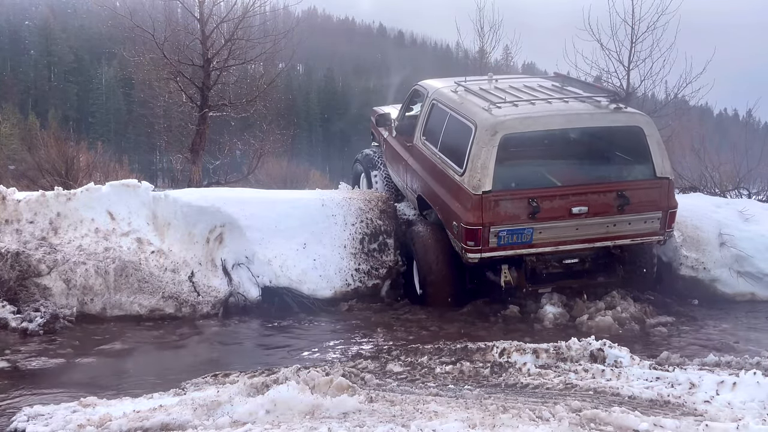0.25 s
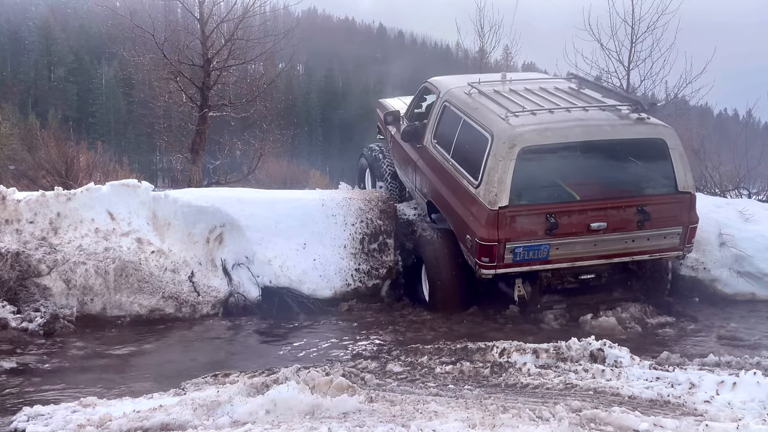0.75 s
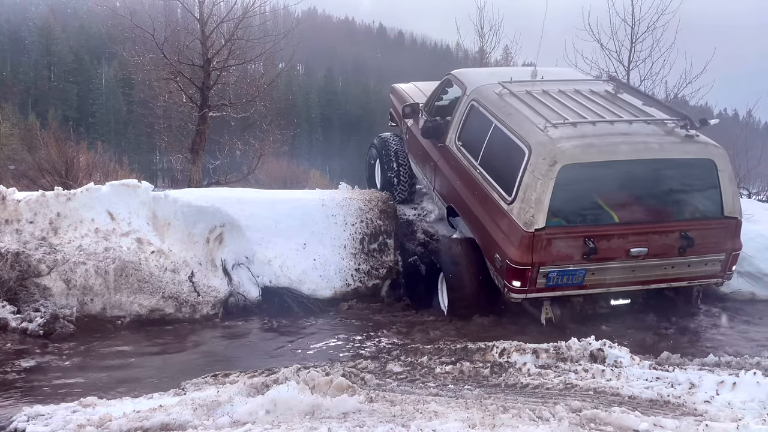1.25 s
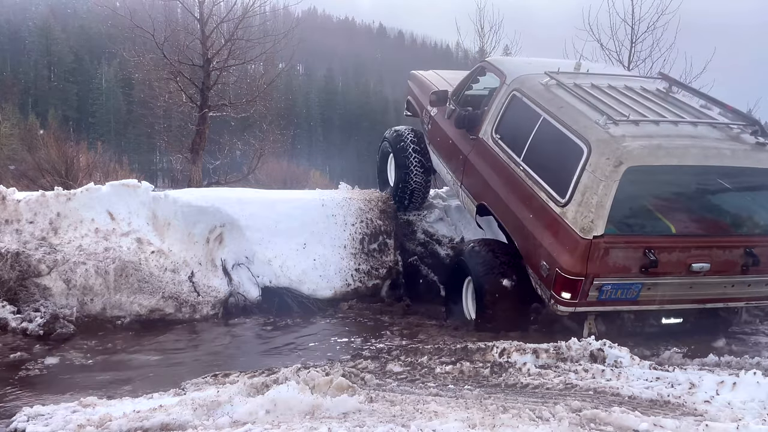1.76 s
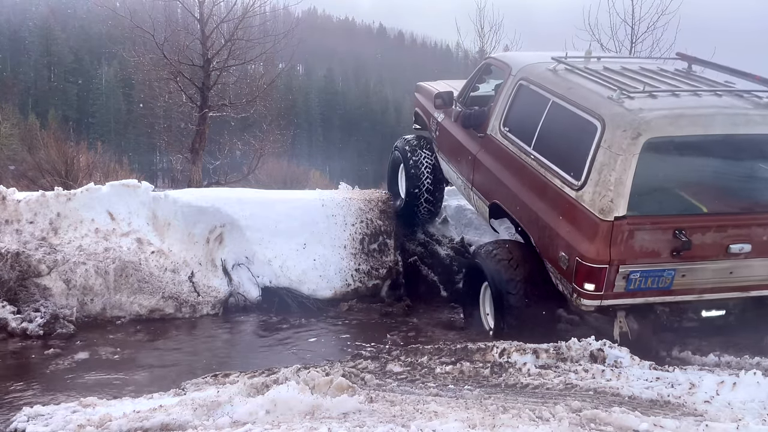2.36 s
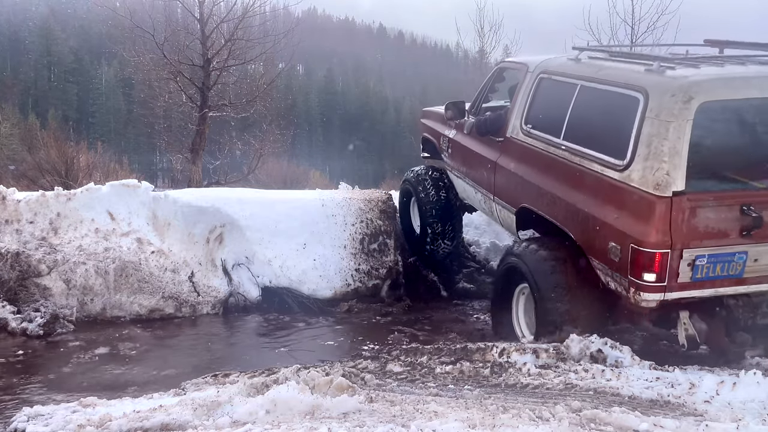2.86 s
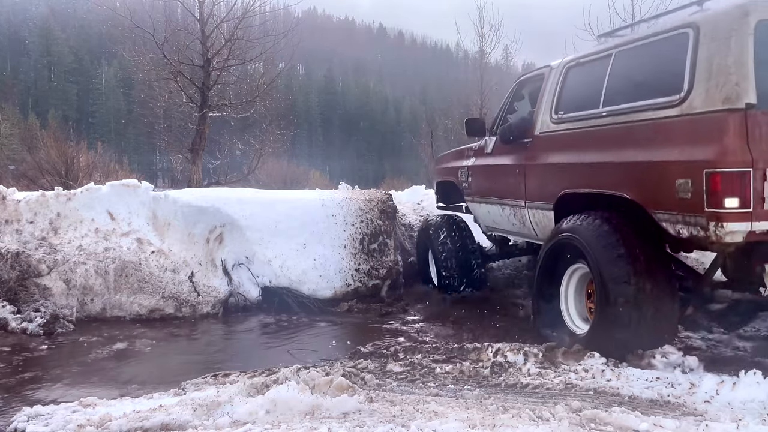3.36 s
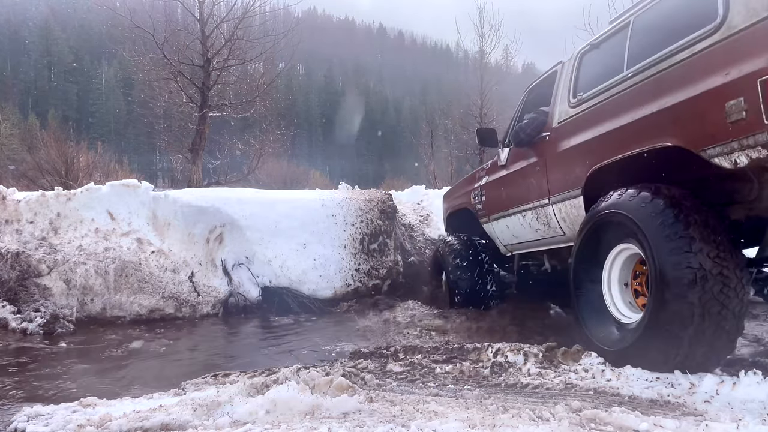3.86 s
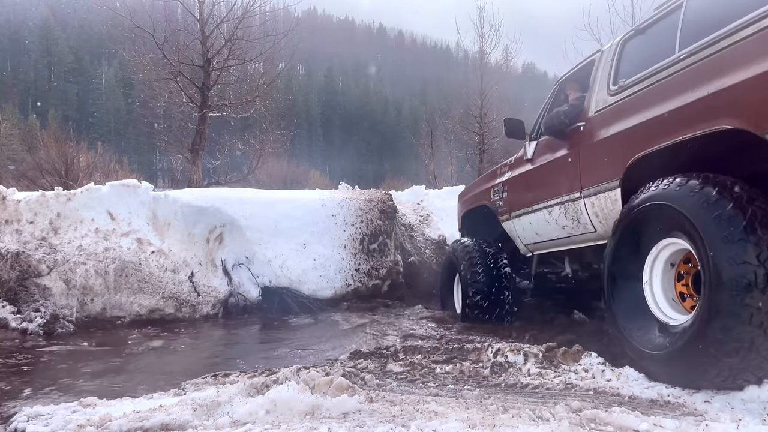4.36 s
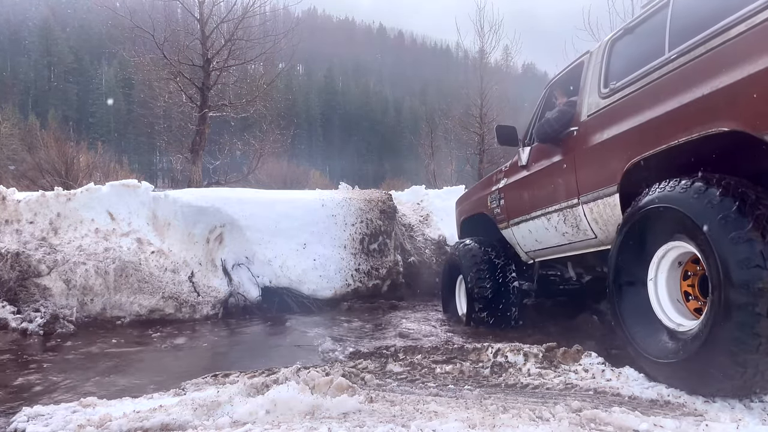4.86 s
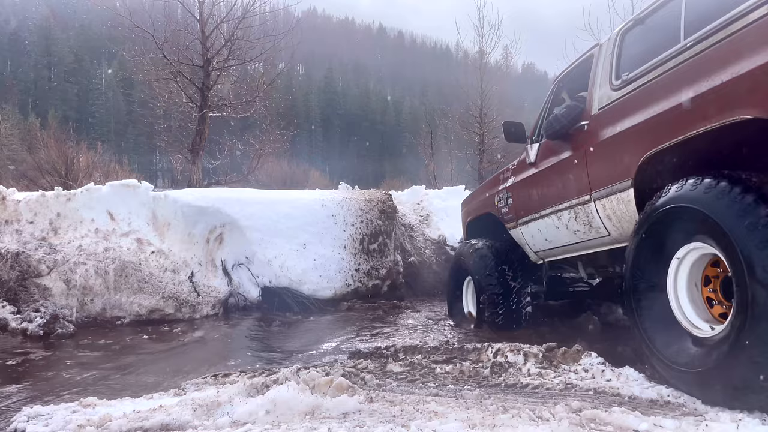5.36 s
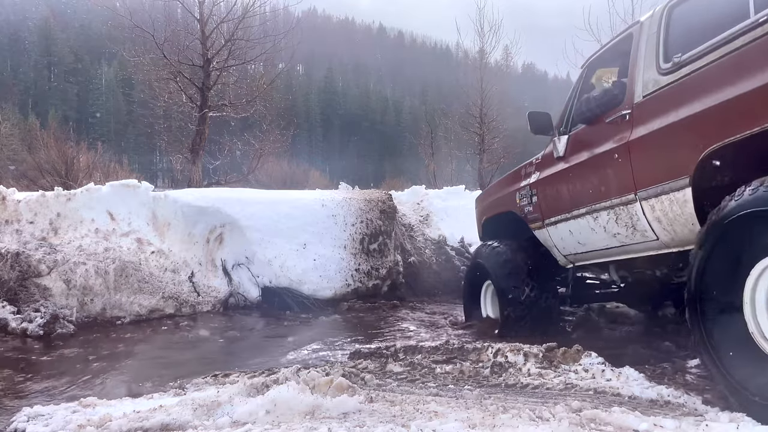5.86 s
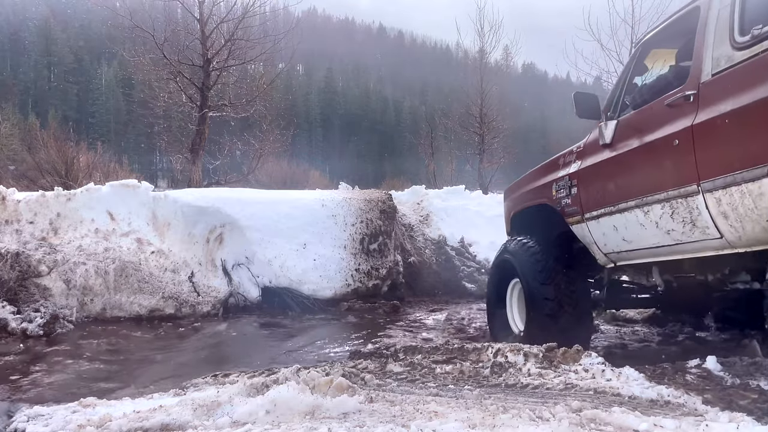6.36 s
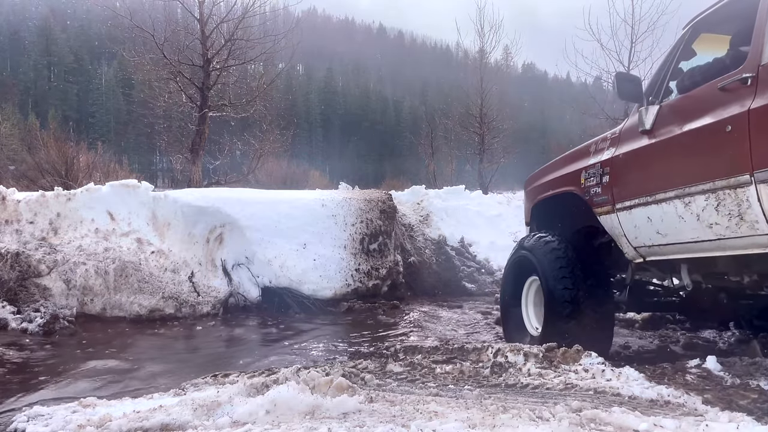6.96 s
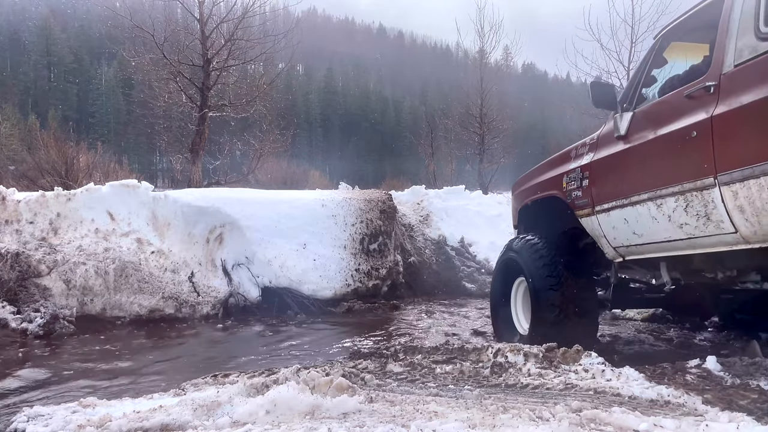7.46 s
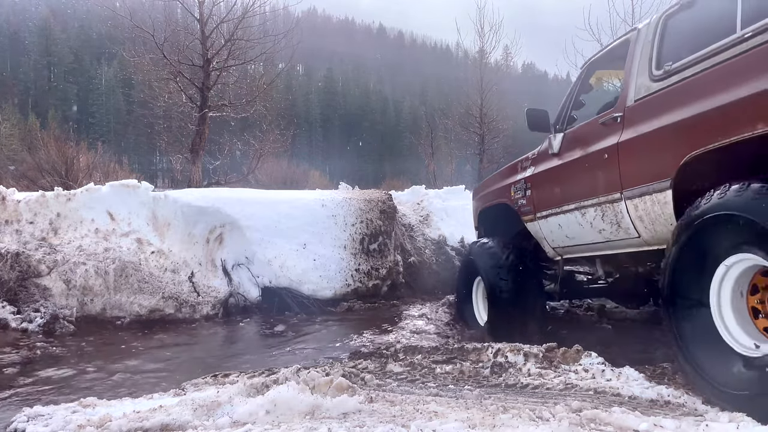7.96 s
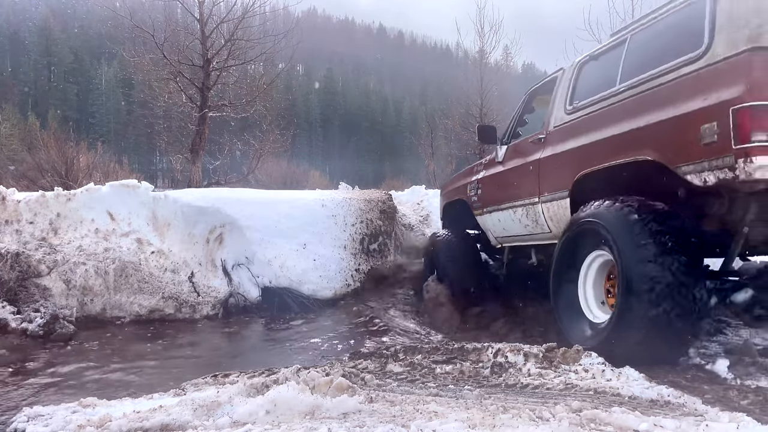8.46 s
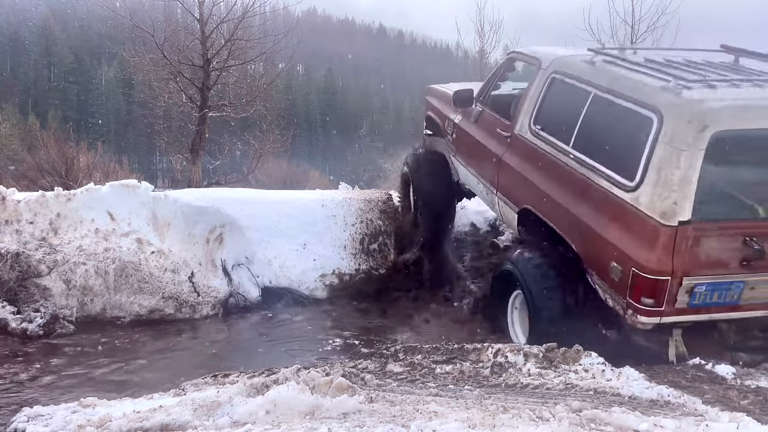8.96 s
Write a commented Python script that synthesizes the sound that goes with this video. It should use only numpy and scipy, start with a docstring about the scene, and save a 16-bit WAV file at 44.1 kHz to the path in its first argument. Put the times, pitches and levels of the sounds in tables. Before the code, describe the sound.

A big eight-cylinder truck engine rumbles unevenly outdoors, swells once and climbs to a roar as its tires churn hissing slush.

```python
"""A truck revving in a slushy ditch

An eight-cylinder truck, off to the right, lopes, idles, revs briefly and finally revs hard.
Each bank (row) of four cylinders fires unevenly into its own pipe, which booms, drones, barks and rasps.
Fan, valve gear and churned slush hiss above it, with ticks, hums, splashes, knocks, pings and a clank."""
import sys
import numpy as np
from scipy import signal
from scipy.fft import rfft, irfft, next_fast_len
from scipy.io import wavfile
from scipy.ndimage import uniform_filter1d

SR = 44100
rng = np.random.default_rng(int(sys.argv[2]) if len(sys.argv) > 2 else 0)


def dump_mix(stems):
    """Bounce the given channels to the path in sys.argv[1] as a 16-bit WAV at rate SR."""
    frames = np.atleast_2d(stems).T  # one column per channel
    limited = np.clip(frames, -1, 1)  # hard clip at full scale
    pcm = np.round(limited * 32767).astype(np.int16)
    wavfile.write(sys.argv[1], SR, pcm)


N = 406602


def amp(db):
    """Turns decibels into a number to multiply a sound by."""
    return 10 ** (np.asarray(db) / 20)


def evened(x, seconds=None):
    """Sets the average power to 1, over the whole sound or over a sliding stretch of seconds."""
    if seconds is None:
        power = np.mean(x ** 2)
    else:
        power = uniform_filter1d(uniform_filter1d(x ** 2, int(seconds * SR)), int(seconds * SR))
    return x / np.sqrt(np.abs(power) + 1e-20)


def over_time(table):
    """Joins a table's rows with straight lines: one curve for each column after the time."""
    times, *columns = np.transpose(table)
    return [np.interp(np.arange(N) / SR, times, column) for column in columns]


def over_pitch(table, hz):
    """Looks up a table at the frequencies hz, on a logarithmic scale."""
    pitches, values = np.transpose(table)
    return np.interp(np.log(hz + 1), np.log(pitches + 1), values)


def add(mix, start, sound):
    """Mixes a sound in at start seconds."""
    part = mix[round(start * SR):][:len(sound)]
    part += sound[:len(part)]


def ring(x, hz, width_hz):
    """A resonance: lets through the sound near one pitch."""
    return signal.lfilter(*signal.iirpeak(hz, hz / width_hz, SR), x)


def trail(x, seconds):
    """Gives every click a fading tail."""
    return signal.lfilter([1], [1, -np.exp(-1 / (seconds * SR))], x)


# The eight cylinders in firing order, one list each: (pipe [0 or 1]), (strength [dB]), (travel time [s])
CYLINDER_PIPE = np.array([0, 1, 1, 0, 1, 0, 0, 1])
CYLINDER_STRENGTH = [0.92, 0.15, 1.3, 0.51, 3.1, -1.5, -0.53, 2.5]
CYLINDER_TRAVEL = [0.0017, 0.00298, 0.0019, 0.00213, 0.00095, 0.002216, 0.0023, 0.0017]
LOPE_SPEED = 8.4  # cycles per second in the opening lope, faster than idle; a cycle is eight firings
SPREAD_DB, SPREAD_S = 2.2, .0004  # how much firings differ in strength and timing at LOPE_SPEED

def firings(speed):
    """Each firing sends a click down its bank's pipe; the slower the engine, the more they differ."""
    wander = evened(uniform_filter1d(uniform_filter1d(rng.standard_normal(N), 4000), 4000))
    cycles = np.cumsum(speed * (1 + .003 * wander)) / SR + .3
    count = np.floor(8 * cycles).astype(int)
    fired = np.flatnonzero(np.diff(count)) + 1
    cylinder, slowness = count[fired] % 8, LOPE_SPEED / speed[fired]
    stronger, later = rng.standard_normal((2000, 2))[:len(fired)].T
    delay = SPREAD_S * slowness * later + np.take(CYLINDER_TRAVEL, cylinder)
    arrival = np.clip(fired + (SR * delay).astype(int), 0, N - 1)
    strength_db = np.take(CYLINDER_STRENGTH, cylinder) + SPREAD_DB * slowness * stronger
    clicks, paired = np.zeros((2, N)), np.zeros(N)
    clicks[np.take(CYLINDER_PIPE, cylinder), arrival] = amp(strength_db)
    paired[fired] = np.cos(np.pi / 2 * cylinder + 0.6)  # beat of cylinders that share an intake
    return clicks, paired


# The exhaust has four voices, from low to high. Each swells as the engine's tones sweep through it:
# (speed [cycles/s], boom [dB], drone [dB], bark [dB], rasp [dB], even beat of both pipes [dB])
LEVELS_BY_SPEED = [(5.17, -15.5, -23.5, -26.5, -42, -17.5), (6.52, -14.5, -16.5, -20.5, -36.5, -9.5),
                   (8, -12.5, -21.5, -19.5, -34, -9), (9.08, -12.5, -17, -20, -29, -9.5),
                   (11.9, -10, -22, -21.5, -33.5, -12.5), (14.8, -10.5, -22, -15, -33.5, 1.5),
                   (18.65, -26.5, -6, -21, -26, -2), (19.44, -17.5, -11.5, -16, -23.5, -2),
                   (23.8, -16, -16, -10, -20, 5)]
# Level changes as the truck rocks, backs up and turns:
# (time [s], boom [dB], drone [dB], bark [dB], lift of the higher bark resonance [dB], rasp [dB])
LEVELS_BY_TIME = [(0, -7.5, -3, 0, 0.5, -3.5), (1.26, -7, -2.5, -2, -6, -4.5),
                  (1.6, -4.5, -8.5, -20.5, 7, -8), (2.2, -4, -12, -4, 0.5, -8), (2.32, -4.5, -8, 0, 3, -1),
                  (2.62, -5.5, -21, 1, 2.5, -8.5), (2.8, -9, -12.5, -0.5, -2, 1),
                  (3.52, -19, -7, -5, -4, -2), (3.75, -5.5, -5, -4, 2, -2), (4.4, -1.2, -3, -2.5, 1, -1),
                  (5.4, -4.5, 0.5, -0.5, 3, -0.5), (7.14, 1.5, -3.5, -1.7, 2.5, -5),
                  (7.42, -3, 2, 1.2, 0.5, 3), (7.9, -1.2, 2.5, 1, 0.5, 8.5),
                  (9.22, -0.5, -11, -1.5, 1.5, -1.5)]
DIP_DB, DIP_LAG_S = (-5, -9, -12, -7.5), (0.015, 0.0091, 0.01, 0.024)  # throttle shut, for each voice

def exhaust_levels(speed):
    """Levels follow speed and time, and dip as the engine slows: a shut throttle weakens the firings."""
    speeds, *columns = np.transpose(LEVELS_BY_SPEED)
    *swells, even_db = [np.interp(speed, speeds, column) for column in columns]
    boom, drone, bark, lift_db, rasp = over_time(LEVELS_BY_TIME)
    slowing = -np.gradient(uniform_filter1d(np.log(speed), 2000)) * SR
    shut = np.tanh((np.maximum(slowing, 0) / 1.43) ** 2)  # 0 is open, 1 is fully shut
    levels_db = []
    for swell, moving, dip, lag in zip(swells, (boom, drone, bark, rasp), DIP_DB, DIP_LAG_S):
        hold = np.exp(-1 / (lag * SR))
        levels_db.append(swell + moving + dip * signal.lfilter([1 - hold], [1, -hold], shut))
    return levels_db, even_db, lift_db


def pipe(gas, resonances, lead_in, clock):
    """Gas makes a pipe ring, already sounding at the start; a faster clock raises its pitch."""
    gas = np.interp(np.arange(clock[-1]), clock, uniform_filter1d(gas, 12))
    gas = np.concatenate([gas[:lead_in], gas])
    out = np.zeros(N)
    for k, (hz, width, db) in enumerate(resonances):
        ringing = ring(ring(gas, hz, width), hz, 2 * width)[lead_in:]
        out += (-1) ** k * amp(db) * np.interp(clock, np.arange(len(ringing)), ringing)
    return out


# How fast the engine runs: (time [s], speed [cycles/s])
ENGINE_SPEED = [(0, 8.45), (.43, 8.45), (.8, 8.75), (1.2, 8.7), (1.32, 8.2), (1.48, 5.1), (1.8, 5.47),
                (2.2, 5.3), (2.6, 6.6), (2.8, 5.4), (3.5, 5.65), (3.85, 5.05), (4.45, 5.2), (5.1, 9.05),
                (5.52, 10.1), (5.72, 9.8), (6.0, 5.6), (6.2, 5.1), (6.7, 5.45), (7.12, 5.25), (7.4, 9),
                (7.72, 11.8), (8.12, 12.65), (8.5, 15.9), (8.63, 18.8), (8.97, 20.5), (9.22, 24)]
# The pipe resonances of each voice, before heat raises them: (pitch [Hz], width [Hz], level [dB])
BOOM_RESONANCES = [(58.6, 8.1, -4)]
DRONE_RESONANCES = [(90.7, 31, 1), (117, 56.7, -2.6)]
BARK_RESONANCES = [(155.8, 36.1, 0), (170.7, 27.7, 1.6)]
RASP_RESONANCES = [(266.5, 47.6, 4.5), (321.5, 30, 2), (371.7, 37.4, -3), (440, 34.5, -1.5),
                   (493, 21, -1.5), (745, 130, -11.5)]
# Rushing gas in boom, drone, bark and rasp: (amount [factor])
GAS_RUSH = (.04, .06, .1, .25)
# For the same four: a swell once a cycle and its place in the cycle; the paired beat and extra even beat
THROB_DB, THROB_PLACE = (0, 0, 1, 1.6), (0, 0, .55, .1)
PAIRED_DB, EXTRA_EVEN_DB = (-10, -8, -4, 2), (0, 0, 0, 5)
HOT_SPEED, HEAT_RISE = 9.4, 0.13  # above this many cycles per second, hotter gas raises the pitch

def exhaust():
    """Firings and rushing gas ring the pipes. Returns the sound and the puffs of gas behind it."""
    (speed,) = over_time(ENGINE_SPEED)
    levels_db, even_db, lift_db = exhaust_levels(speed)
    low_bark, (hz, width, db) = BARK_RESONANCES
    voices = BOOM_RESONANCES, DRONE_RESONANCES, [low_bark, (hz, width, db + lift_db)], RASP_RESONANCES
    cycles = np.cumsum(speed) / SR
    clock = np.cumsum((np.maximum(speed, HOT_SPEED) / HOT_SPEED) ** HEAT_RISE)
    (near, far), paired = firings(speed)
    lope, even = near - far, near + far  # the limping beat and the steady beat of the two banks
    puffs = evened(trail(near + .4 * far, .01), .3)  # gas rushes out after each valve opens
    rush = (.45 + .7 * puffs) * (9 / speed) ** 1.6 * rng.standard_normal(N)  # rougher when slow
    out = np.zeros(N)
    for k, sign in enumerate((-1, 1, 1, 1)):  # the boom swings opposite to its neighbour
        beats = evened(lope + amp(even_db + EXTRA_EVEN_DB[k]) * even + amp(PAIRED_DB[k]) * paired, 0.96)
        voice = pipe(beats + GAS_RUSH[k] * rush, voices[k], int(2 * SR / speed[0]), clock)
        throb_db = THROB_DB[k] * np.cos(2 * np.pi * (cycles - THROB_PLACE[k]))
        out += sign * amp(levels_db[k] + throb_db) * evened(voice, 0.091)
    bass_cut = signal.butter(4, 52, "high", fs=SR, output="sos")  # pipe mouths give off no deep bass
    return signal.sosfilt(bass_cut, out), puffs


# Hiss at LOPE_SPEED, as the truck nears and the wheels churn: (time [s], clatter [dB], spray [dB])
HISS_LEVELS = [(0, -49, -60.5), (1.2, -45, -54.5), (1.6, -39.5, -51), (2.5, -38.5, -49.5),
               (3.26, -35, -44.5), (3.75, -34, -39.5), (4.5, -35, -48), (6.14, -36, -45.5),
               (7.15, -33.5, -48), (8.22, -35, -42.5), (8.47, -35, -39), (8.58, -29, -39), (8.8, -32, -37),
               (8.94, -36.5, -42), (9.22, -36.5, -40.5)]
CLATTER_DB_PER_DOUBLING, SPRAY_DB_PER_DOUBLING = 6.5, 3.5

def hiss_levels():
    """Clatter and spray both grow louder with each doubling of the engine speed."""
    clatter_db, spray_db = over_time(HISS_LEVELS)
    doublings = np.log2(over_time(ENGINE_SPEED)[0] / LOPE_SPEED)
    return clatter_db + CLATTER_DB_PER_DOUBLING * doublings, spray_db + SPRAY_DB_PER_DOUBLING * doublings


def patchy_noise(tone, patchy_db):
    """Noise shaped by a tone table, with drifting loud and quiet patches."""
    frames, hz = N // 128 + 5, np.fft.rfftfreq(512, 1 / SR)
    real, imaginary, patches = rng.standard_normal((frames, 257, 3)).T
    patches = evened(uniform_filter1d(uniform_filter1d(patches, 8, axis=0), 14, axis=1))
    spectra = (real + 1j * imaginary) * amp(over_pitch(tone, hz)[:, None] + patchy_db * patches)
    return evened(signal.istft(spectra, nperseg=512, noverlap=384)[1][:N])


# The tone of the fan and valve gear: (frequency [Hz], level [dB])
CLATTER_TONE = [(220, -5), (600, 2.5), (1100, 0), (1600, -2), (2300, -7.5), (2900, -8.5), (3600, -47),
                (6000, -68)]

def clatter(puffs, level_db):
    """Fan and valve gear noise throbs with the firings, most of all in the ringing valve cover."""
    cover = evened(ring(puffs ** 2 * rng.standard_normal(N), hz=2055, width_hz=190), 0.26)
    whirr = patchy_noise(CLATTER_TONE, patchy_db=1.7) * (0.95 + 0.033 * puffs)
    return amp(level_db) * (whirr + 0.18 * cover)


# The tone of flying slush: (frequency [Hz], level [dB])
SPRAY_TONE = [(1500, -44), (3000, 1.5), (5000, 2), (6600, 0.5), (8000, -10.5), (10000, -2.5), (12200, -5.5),
              (14000, -13.5), (15700, -30)]

def spray(drops, level_db):
    """Slush churned by the wheels hisses, flaring up with single drops."""
    flare = 1 + 0.13 * trail(drops, 0.002)
    return amp(level_db) * patchy_noise(SPRAY_TONE, patchy_db=2.5) * flare


# The loud taps on metal: (time [s], level [dB], pitch [Hz])
LOUD_TICKS = [(2.362, -23, 1970), (4.0532, -18, 2100), (4.2216, -21, 2030), (4.4154, -18.5, 2220),
              (6.2666, -14, 2220), (6.335, -16.5, 1850), (6.4532, -21.5, 2175), (6.644, -20.5, 2220),
              (6.713, -18.5, 2000), (6.8996, -22, 2100), (7.019, -20.5, 2130), (7.114, -20, 2050),
              (8.8487, -11, 2210)]

def ticks(clatter_db):
    """Taps give a metal cover a short, fuzzy ring; faint ones patter at random between the loud ones."""
    out, t = np.zeros(N), np.arange(2200) / SR
    when, size, pitch = rng.random((750, 3)).T
    faint_db = clatter_db[(when * N).astype(int)] + 4 + 5 * size ** 2
    taps = LOUD_TICKS + list(zip(when * N / SR, faint_db, 1900 + 600 * pitch))
    rise = 1 - np.exp(-t / .0014)
    for start, db, hz in taps:
        fuzz = evened(ring(ring(rng.standard_normal(len(t)), hz, 280), hz, 560))
        body = 0.2 * np.sin(2 * np.pi * hz * t) + 0.26 * fuzz
        add(out, start, amp(db - 60 * t / .11) * body * rise)
    return out


# Hums under load: (time [s], length [s], first pitch [Hz], last pitch [Hz], level [dB])
LOAD_HUMS = [(.68, .4, 206, 256, -31), (2.3, .36, 172, 188, -27), (7.16, .2, 258, 272, -27)]

def hums():
    """The straining truck hums briefly: tones that slide upward as they fade in and out."""
    out = np.zeros(N)
    for start, length, from_hz, to_hz, db in LOAD_HUMS:
        hz = np.linspace(from_hz, to_hz, int(length * SR))
        tone = np.sqrt(2) * np.sin(2 * np.pi * np.cumsum(hz) / SR)
        add(out, start, amp(db) * tone * signal.windows.tukey(len(hz), .6))
    return out


# Short noisy bursts: slush splashes and, last, one sharp metal clank during the hard rev:
# (time [s], level [dB], time to fade by 60 dB [s], centre pitch [Hz])
NOISY_BURSTS = [(0.728, -37, 0.082, 800), (0.913, -31.5, 0.067, 3660), (1.301, -35, 0.11, 2600),
                (1.451, -31.5, 0.09, 6000), (2.757, -33, 0.25, 2200), (3.272, -20.5, 0.3, 2400),
                (3.284, -20.5, 0.25, 750), (3.328, -28, 0.2, 2400), (3.365, -25, 0.14, 1090),
                (4.059, -15.5, 0.082, 2300), (4.061, -25, 0.074, 850), (6.177, -19, 0.15, 2100),
                (6.772, -35, 0.2, 6000), (8.661, -35, 0.49, 990), (8.848, 0.5, 0.026, 2670)]

def splashes_and_clank():
    """Crackling bursts of noise, quick to rise and strongest near their centre pitch."""
    out, t = np.zeros(N), np.arange(16000) / SR
    rise = 1 - np.exp(-t / .004)
    for (start, db, fade, hz), (noise, lumps) in zip(NOISY_BURSTS, rng.standard_normal((24, 2, len(t)))):
        crackle = noise * amp(1.9 * evened(uniform_filter1d(lumps, 130)))
        body = ring(ring(crackle, hz, min(1.7 * hz, 9000)), hz, 2.4 * hz)
        fizz = .09 * ring(crackle, 8000, 9000)
        add(out, start, .45 * amp(db - 60 * t / fade) * evened(body + fizz) * rise)
    return out


# Knocks and cracks of bodywork and ice: (time [s], level [dB], pitch [Hz], time to fade by 60 dB [s])
HARD_KNOCKS = [(.729, -31.5, 744, 0.099), (1.305, -30.5, 2210, 0.055), (1.312, -33.5, 698, 0.14),
               (3.2739, -21, 3100, 0.0097), (3.2862, -16, 740, 0.011)]

def knocks():
    """Each sharp blow rings at one pitch and quickly dies away."""
    out, t = np.zeros(N), np.arange(6000) / SR
    for start, db, hz, fade in HARD_KNOCKS:
        add(out, start, amp(db - 60 * t / fade) * np.sin(2 * np.pi * hz * t))
    return out


# Short pings: (time [s], level [dB], pitch [Hz])
HIGH_PINGS = [(3.585, -28, 4930), (8.846, -18, 2390)]

def pings():
    """Clean high tones that start fast and fade within a few hundredths of a second."""
    out, t = np.zeros(N), np.arange(0, .05, 1 / SR)
    shape = np.exp(-(t / .021) ** 3) * (1 - np.exp(-t / .004))
    for start, db, hz in HIGH_PINGS:
        add(out, start, amp(db) * np.sin(2 * np.pi * hz * t) * shape)
    return out


# Tones of the hard rev: (time [s], length [s], pitch [multiple of engine speed], level [dB])
REV_TONES = [(8.42, .42, 10, -25), (8.5, .5, 18, -30), (8.56, .44, 22, -32), (9.0, .4, 13, -27)]

def singing():
    """Tones that climb with the engine, swelling as the hard rev sweeps them through a pipe resonance."""
    out, t = np.zeros(N), np.arange(N) / SR
    cycles = np.cumsum(over_time(ENGINE_SPEED)[0]) / SR
    for start, length, multiple, db in REV_TONES:
        swell = np.sin(np.pi * np.clip((t - start) / length, 0, 1))
        out += amp(db) * np.sqrt(2) * swell * np.sin(2 * np.pi * multiple * cycles)
    return out


def scene():
    """The direct sound, and the sound scattered by snow, water and bodywork, each with its own hiss."""
    pipes, puffs = exhaust()
    clatter_db, spray_db = hiss_levels()
    drop_sizes = amp(8.1 * np.minimum(rng.exponential(1, N), 2.8))
    drops = drop_sizes * (rng.random(N) < 60 / SR)  # about 60 a second
    direct = pipes + ticks(clatter_db) + hums() + splashes_and_clank() + knocks() + pings() + singing()
    echo = rng.standard_normal(4000) * amp(-60 * np.arange(4000) / SR / 0.095)
    scattered = signal.oaconvolve(direct, echo / np.linalg.norm(echo))[:N]
    return np.array([x + clatter(puffs, clatter_db) + spray(drops, spray_db) for x in (direct, scattered)])


# How much weaker the left microphone is: (frequency [Hz], left minus right [dB])
LEFT_SHADOW = [(60, -3.5), (160, -5), (300, -7), (1000, -9), (2400, -5), (4500, -1.8), (9000, -.6)]
# How far its wave runs ahead of the right one: (frequency [Hz], lead [radians])
LEFT_LEAD = [(30, -.25), (150, -.65), (380, -.95), (700, -1.7), (2500, -.6), (4480, -.4), (5170, 2.8),
             (5860, 3.3), (6700, 5.8), (7750, 3.1), (10400, 2.2), (12600, .1)]
# How alike the two sides are: (frequency [Hz], likeness [0 to 1])
SIDE_LIKENESS = [(170, 1), (280, .92), (600, .5), (1500, .72), (5000, .65), (9000, .72), (13000, .88)]
OVERLOAD_LEVEL, TREBLE_LIMIT_HZ = .85, 15680

def record(dry):
    """A phone's two microphones: the left is shadowed, shifted in phase and hears the scattered sound."""
    size = next_fast_len(N + 4096)
    hz = np.fft.rfftfreq(size, 1 / SR)
    direct, scattered = rfft(dry, size)
    alike = np.clip(over_pitch(SIDE_LIKENESS, hz), 0, 1)
    tilt = amp(over_pitch(LEFT_SHADOW, hz) / 2)
    left = (alike * direct + np.sqrt(1 - alike ** 2) * scattered) * np.exp(1j * over_pitch(LEFT_LEAD, hz))
    stereo = irfft(np.array([left * tilt, direct / tilt]), size)[:, :N]
    stereo = OVERLOAD_LEVEL * np.tanh(stereo / OVERLOAD_LEVEL)  # the phone rounds off the loudest peaks
    treble_cut = signal.firwin(1535, TREBLE_LIMIT_HZ, window=("kaiser", 9), fs=SR)
    return signal.oaconvolve(stereo, treble_cut[None], "same")


dry = scene()
out = record(dry)
dump_mix(out)
```